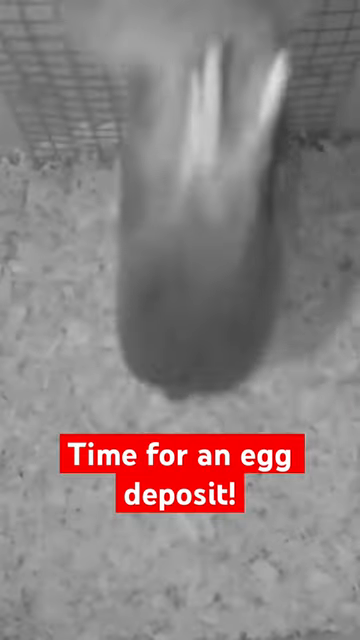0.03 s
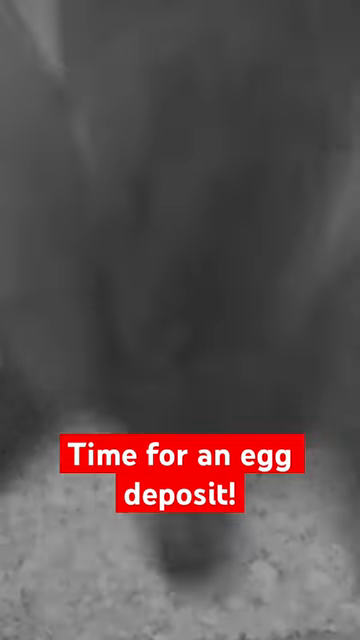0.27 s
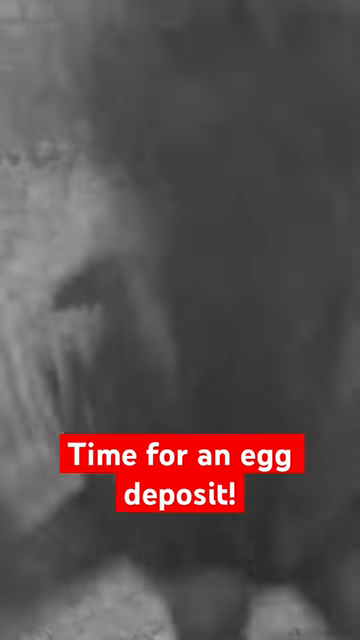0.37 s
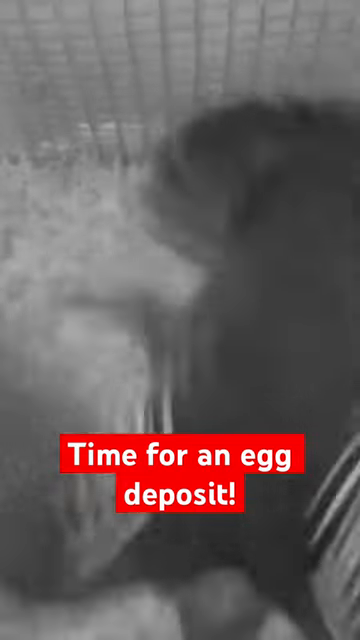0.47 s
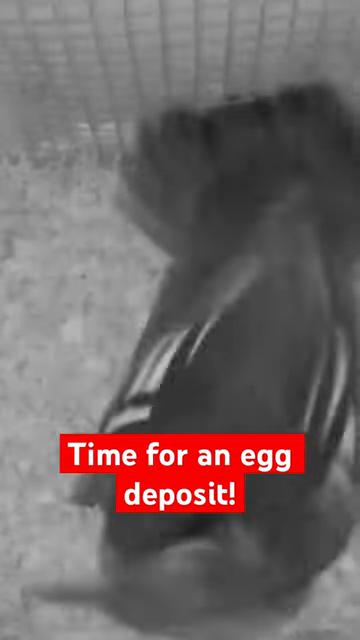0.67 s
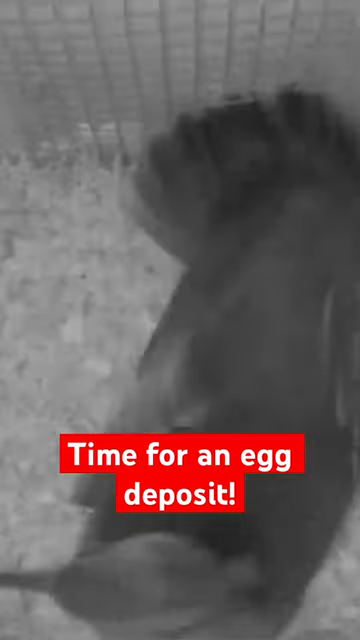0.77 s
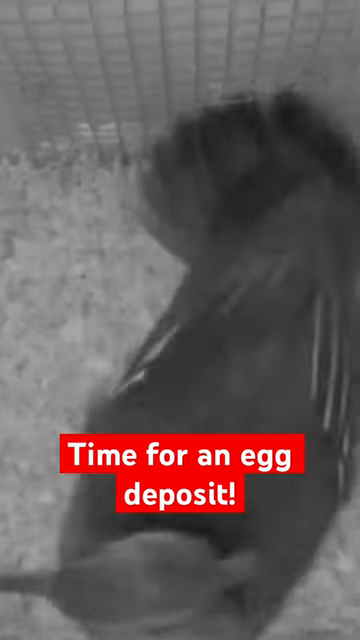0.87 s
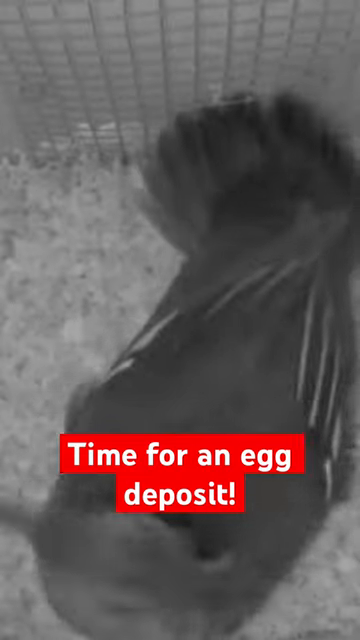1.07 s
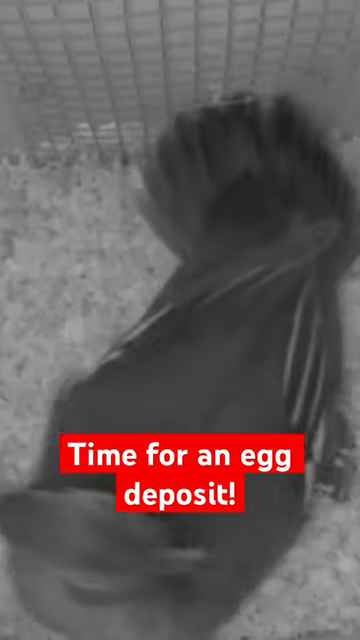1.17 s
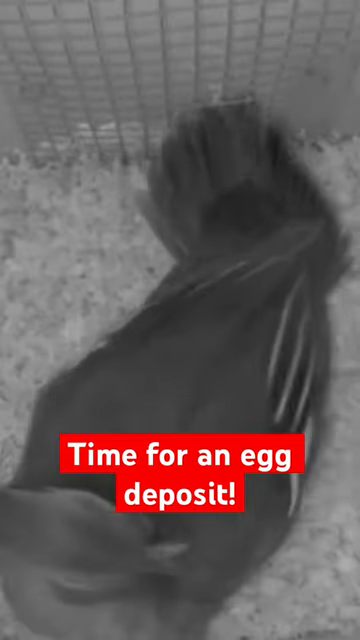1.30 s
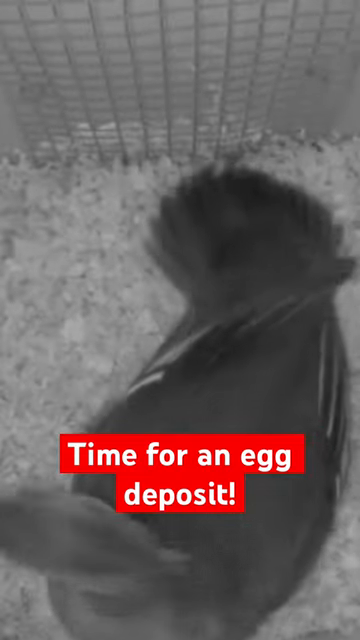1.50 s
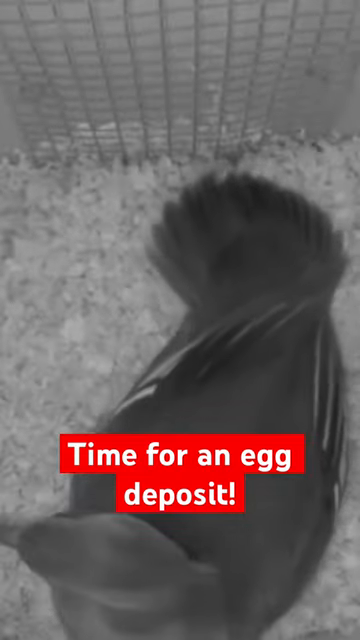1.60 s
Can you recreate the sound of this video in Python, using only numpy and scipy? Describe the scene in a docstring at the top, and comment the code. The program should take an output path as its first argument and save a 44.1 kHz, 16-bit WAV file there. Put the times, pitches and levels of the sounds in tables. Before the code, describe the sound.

A bird lands close to the microphone inside a nest box, its wings swishing and its body bumping the wood. The rustle of shavings dies down and returns in a short, crunchy shuffle before one faint, distant chirp.

```python
"""A bird lands in its nest box

A bird drops into a wooden nest box, brushing past the microphone, and settles on wood shavings.
Feathers and shavings crackle, its body rubs and bumps the box, and stiff quills judder along the wall;
later it shuffles once more. A thin tick sounds just before the dull sound fades in, with faint hiss and
rumble underneath. At the end a far bird chirps outside."""
import sys
import numpy as np
from scipy import signal
from scipy.fft import rfft, irfft
from scipy.io import wavfile
from scipy.ndimage import uniform_filter1d

SR = 44100
rng = np.random.default_rng(int(sys.argv[2]) if len(sys.argv) > 2 else 0)


def master(y):
    """Save y as 16-bit WAV."""
    cut = np.clip(np.atleast_2d(y).T, -1, 1)
    pcm = np.round(cut * 32767)  # scale
    wavfile.write(sys.argv[1], SR, pcm.astype(np.int16))


N = 72765
T = np.arange(N) / SR


# how hard the bird stirs feathers and shavings (time [s], level [dB])
STIRRING = [(.168, -84), (.19, -60), (.198, -42.5), (.23, -36), (.256, -29), (.308, -29), (.32, -33.5),
            (.39, -23.5), (.412, -24.5), (.44, -24), (.452, -32.5), (.535, -40.5), (.57, -40), (.62, -38.5),
            (.68, -48.5), (.715, -42.5), (.775, -47), (.82, -43.5), (.9, -53), (1.08, -55.5), (1.255, -46),
            (1.29, -41.5), (1.325, -44), (1.348, -32), (1.402, -32.5), (1.422, -35.5), (1.468, -42),
            (1.495, -47), (1.6, -52.5), (1.65, -52)]
# tone of the rustle (frequency [Hz], relative level [dB])
RUSTLE_TONE = [(300, -22), (720, -3.5), (1000, -26.5), (1270, -0.5), (1600, -1), (2100, 2), (2700, -2),
               (3100, 2.5), (3550, -4), (4300, 5), (5000, -0.5)]
def rustle():
    """Feathers and shavings crackle as they are stirred."""
    return crackle(RUSTLE_TONE) * undb(curve(STIRRING) + 1.53 * wobble(130))


# bumps of feet and body (start [s], strength [dB], contact time [ms], crunch level [dB])
BUMPS = [(.197, -28.5, 2.54, -46.5), (0.248, -17.5, 2.37, -52), (0.264, -23, 1.84, -43),
         (.316, -8.5, 2.76, -37), (.323, -29, 1.8, -30), (0.389, -27, 2.8, -25.5), (.42, -33, 1.2, -41),
         (0.433, -20, 2.8, -27), (0.468, -17, 4.6, -23), (0.507, -24, 1.87, -46), (0.55, -29.5, 1.56, -55),
         (0.631, -28.5, 2.9, -41), (.711, -36.5, 2.8, -41), (.719, -32.5, 1.4, -48.5),
         (0.755, -38, 2.14, -32), (0.799, -40, 2.4, -34), (0.904, -27.5, 3, -40.5),
         (1.268, -32.5, 1.7, -28), (1.348, -23, 3.8, -28), (1.365, -21, 1.6, -22),
         (1.3861, -20.5, 1.85, -12.5), (1.393, -29, 2.8, -49), (1.3972, -19.5, 2.23, -15),
         (1.403, -27.5, 3.9, -20)]
# notes of the box (pitch [Hz], time to fade by 60 dB [s], relative level [dB])
BOX_NOTES = [(70.5, 0.27, -15.5), (128, 0.18, -2.5), (165, 0.044, -0.5), (249.2, 0.069, 4),
             (296, 0.076, 1.5), (414, 0.06, 0.5), (622, 0.026, 6)]
def bumps():
    """Each soft push makes the box ring briefly; a longer contact sounds duller."""
    pushes = 0
    for start, db, contact_ms, _ in BUMPS:
        contact_s = contact_ms / 1000
        pushes += undb(db) * swell(start, contact_s) / (contact_s * SR)
    ring = 0
    for hz, fade_s, db in BOX_NOTES:
        ring += undb(db - 60 * T / fade_s) * np.cos(2 * np.pi * hz * T)
    return undb(-2.5) * signal.fftconvolve(pushes, ring)[:N]


# tone of crushed shavings (frequency [Hz], relative level [dB])
CRUNCH_TONE = [(300, -15.5), (1000, -7), (2200, 3.5), (3500, -8.5), (4700, 5)]
def crunches(decay_s=0.0041):
    """Each bump crushes a cluster of shavings."""
    level = 0
    for start, _, _, db in BUMPS:
        level += undb(db) * (T >= start) * np.exp(-np.abs(T - start) / decay_s)
    return crackle(CRUNCH_TONE) * level


# wing movements (start [s], length [s], level [dB])
SWISHES = [(.312, 0.034, -22), (.34, 0.065, -23), (0.546, 0.057, -38), (0.697, 0.037, -41),
           (0.718, 0.081, -45)]
# tone of the feathers (frequency [Hz], relative level [dB])
SWISH_TONE = [(900, -37.5), (1800, -9), (2900, 4), (4300, 6), (5000, 1.5)]
def swishes():
    """Wing feathers slide over one another with a bright swish."""
    level = sum(undb(db) * np.sqrt(swell(start, length)) for start, length, db in SWISHES)
    return crackle(SWISH_TONE) * level


# tone of the scuffed floor (frequency [Hz], relative level [dB])
SCUFF_TONE = [(100, -0.5), (200, -5), (290, -4), (420, -9.5), (550, -15), (800, -26), (1500, -63.5)]
# tone of the body's rumble (frequency [Hz], relative level [dB])
RUMBLE_TONE = [(15, -5.5), (35, 0.5), (70, 4), (130, -2), (195, -6), (260, -17.5), (600, -59)]
# the body moving against the box (time [s], level [dB])
RUMBLE_LEVEL = [(.16, -36), (.22, -27), (.26, -22.5), (.32, -21), (.43, -28), (.46, -30.5), (.6, -34.5),
                (.68, -40), (.8, -34.5), (.88, -42), (1.0, -39), (1.09, -46.5), (1.26, -39), (1.33, -45),
                (1.39, -73), (1.46, -42), (1.58, -43), (1.65, -39)]
def rubbing():
    """The stirring also scuffs the wooden floor, over the rumble of the moving body."""
    scuff = steady(colour(noise(), SCUFF_TONE), 0.023) * undb(curve(STIRRING) - 1.5)
    rumble = steady(colour(noise(), RUMBLE_TONE), 0.039) * undb(curve(RUMBLE_LEVEL))
    return scuff + rumble


# puffs of air (start [s], length [s], frequency [Hz], level [dB])
PUFFS = [(0.228, 0.086, 67.9, -16), (0.242, 0.074, 25.7, -10.5), (.79, 0.034, 72, -32)]
def puffs():
    """The moving body pushes air to and fro at the microphone."""
    return sum(undb(db) * swell(start, length) ** 2 * np.sin(2 * np.pi * hz * (T - start))
               for start, length, hz, db in PUFFS)


# quills dragging on the wall (start [s], length [s], first rate [Hz], last rate [Hz], level [dB])
JUDDERS = [(.17, 0.097, 165, 142.4, -27), (.335, 0.081, 137.7, 179, -22.5),
           (0.903, .08, 133.6, 106.4, -31.5)]
def judders(jitter=0.051, sharpness=0.14):
    """Quills stick and slip in short, uneven runs of rounded pulses."""
    sound = 0
    for start, length, first_hz, last_hz, db in JUDDERS:
        hz = np.interp(T, [start, start + length], [first_hz, last_hz])
        hz *= 1 + jitter * wobble(122.4)
        turn = np.exp(2j * np.pi * np.cumsum(hz * (T >= start)) / SR)  # one turn for each slip
        slips = np.imag(turn / (1 - sharpness * turn))  # a lopsided sine wave
        first = int(start * SR)
        sound += undb(db) * swell(start, length) * np.pad(unit(slips[first:]), (first, 0))
    return sound


# the far bird's note (time [s], pitch [Hz])
CHIRP_PITCH = [(1.606, 3020), (1.628, 3480), (1.639, 3100), (1.65, 3000)]
def chirp(level_db=-49.5, roughness_db=4):
    """A far bird gives one slightly rough peep that rises and falls."""
    level = undb(level_db + roughness_db * wobble(570)) * swell(start=1.603, length=0.064) ** 2
    return level * np.sin(2 * np.pi * np.cumsum(curve(CHIRP_PITCH)) / SR)


# tone of the background (frequency [Hz], relative level [dB])
BACKGROUND_TONE = [(20, -3.5), (70, 20), (130, -8.5), (280, -8), (500, 0.5), (1000, -5), (2000, -5.5),
                   (3000, -7), (5000, -7)]
def background(level_db=-48):
    """Faint hiss and rumble lie under everything."""
    return undb(level_db) * colour(noise(), BACKGROUND_TONE)


def crackle(tone, snaps_per_s=2500):
    """Tiny snaps of uneven size in a bed of finer ones."""
    snaps = (rng.random(N) < snaps_per_s / SR) * np.sign(noise())
    snaps *= undb(-0.5 * np.minimum(rng.exponential(size=N), 4))
    fine_snaps = undb(2) * noise()
    return steady(colour(unit(snaps) + fine_snaps, tone), 0.01)


def undb(db):
    """Turn decibels into a multiplier."""
    return 10 ** (np.asarray(db) / 20)


def unit(x):
    """Scale to an average size (rms) of 1."""
    return x / np.sqrt(np.mean(x ** 2))


def curve(rows):
    """Join (time, value) points by straight lines."""
    return np.interp(T, *np.array(rows).T)


def colour(x, tone):
    """Shape a sound with a tone table, at an average size of 1."""
    hz, db = np.array(tone).T
    freqs = np.maximum(np.fft.rfftfreq(N, 1 / SR), 1)
    gain = undb(np.interp(np.log(freqs), np.log(hz), db))
    return unit(irfft(rfft(x) * gain, N))


def noise():
    return rng.standard_normal(N)


def wobble(rate_hz):
    """A smooth random wander with an average size of 1."""
    size = max(int(SR / rate_hz), 2)
    return unit(uniform_filter1d(uniform_filter1d(noise(), size), size))


def steady(x, span_s):
    """Take the slow swells out of a noise."""
    return x / np.sqrt(uniform_filter1d(x ** 2, max(int(span_s * SR), 2)) + 1e-9)


def lowpass(x, hz, order):
    """Cut the treble above hz; a higher order cuts more steeply."""
    ratio = np.minimum(np.fft.rfftfreq(N, 1 / SR) / hz, 2)
    return irfft(rfft(x) / np.sqrt(1 + ratio ** (2 * order)), N)


def swell(start, length):
    """A smooth rise and fall, timed in seconds."""
    return np.sin(np.pi * np.clip((T - start) / length, 0, 1))


def scene():
    """Add all the sounds into one channel."""
    hiss = background()
    bird = rustle() + bumps() + crunches() + swishes() + rubbing() + puffs() + judders()
    return (bird + chirp() + hiss)[None]


def record(dry):
    """A thin, high tick sounds just before the dull sound fades in."""
    tick_s, start_s, fade_s, treble_limit_hz = 0.1572, 0.16, 0.026, 5050
    fade_in = np.clip((T - start_s) / fade_s, 0, 1)
    dull = lowpass(dry[0] * fade_in, treble_limit_hz, order=150)
    spike = 1.0 * (np.arange(N) == int(tick_s * SR))
    tick = lowpass(spike, hz=7200, order=40) - lowpass(spike, treble_limit_hz, order=150)
    tick *= undb(-22) / np.abs(tick).max()
    return lowpass(dull + tick, hz=8048, order=60)[None]


dry = scene()
out = record(dry)
master(out)
```